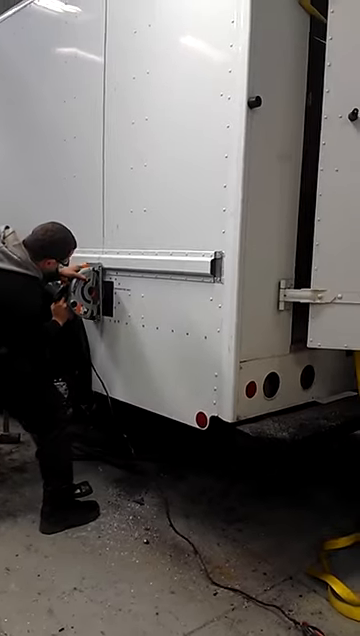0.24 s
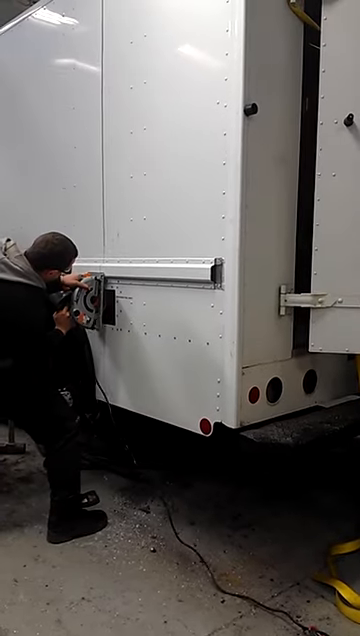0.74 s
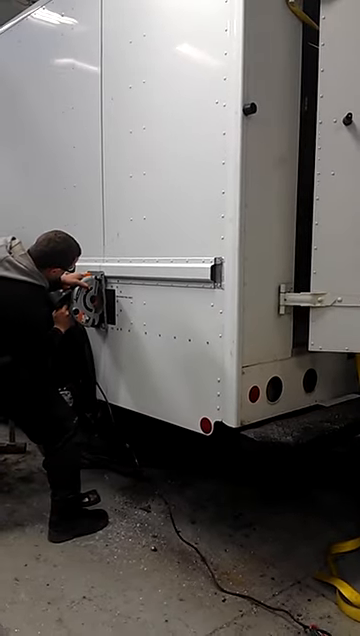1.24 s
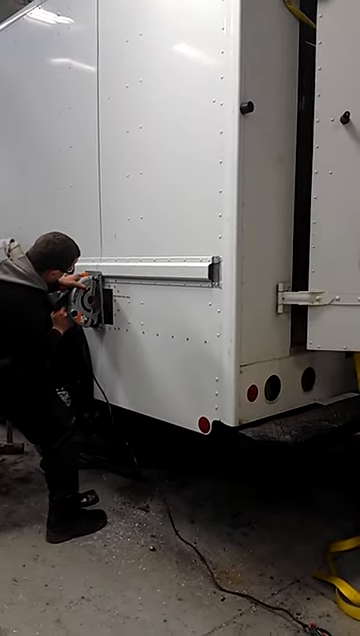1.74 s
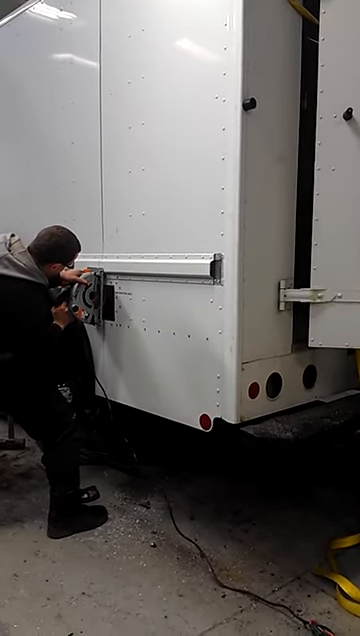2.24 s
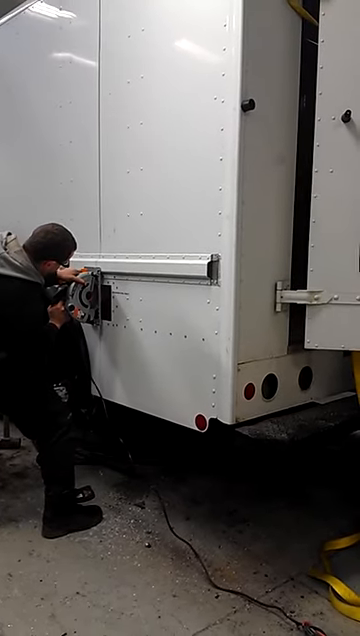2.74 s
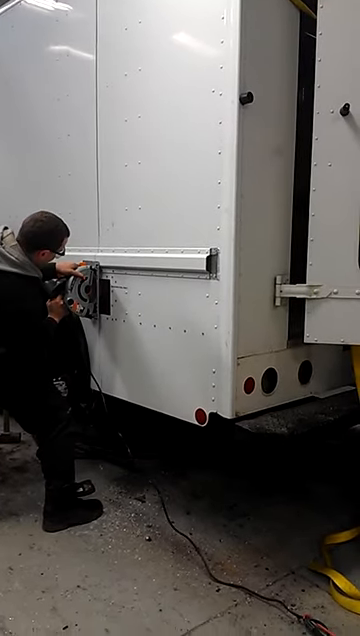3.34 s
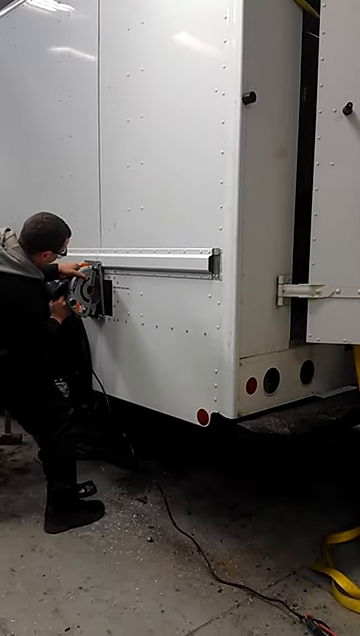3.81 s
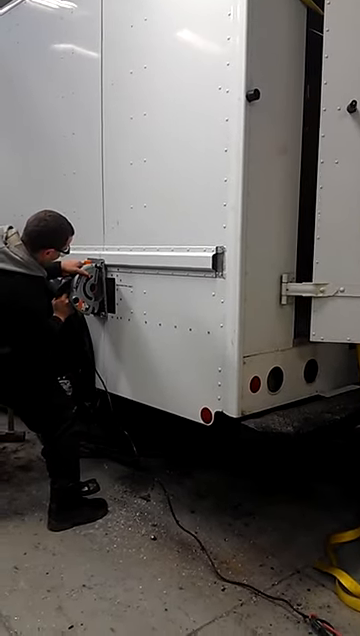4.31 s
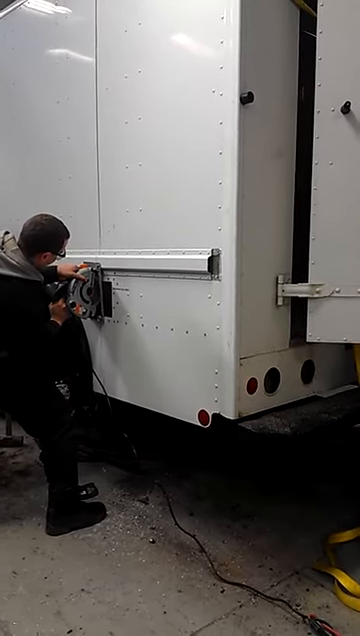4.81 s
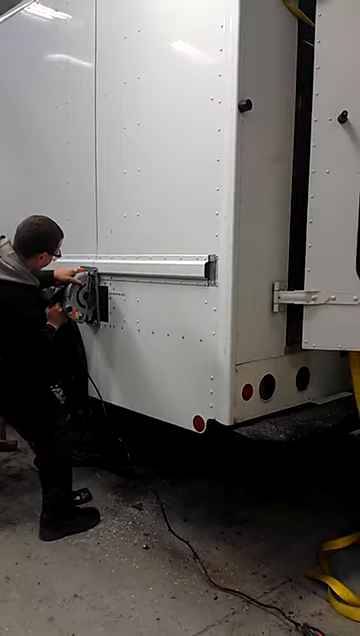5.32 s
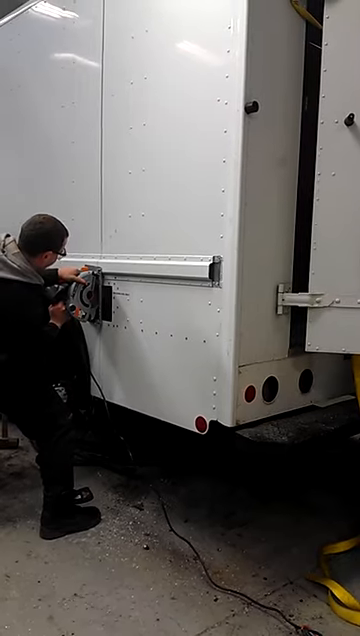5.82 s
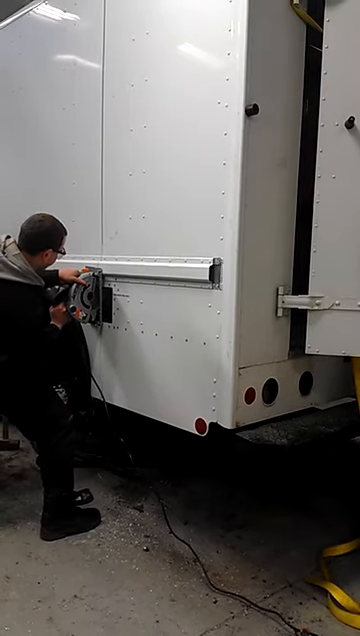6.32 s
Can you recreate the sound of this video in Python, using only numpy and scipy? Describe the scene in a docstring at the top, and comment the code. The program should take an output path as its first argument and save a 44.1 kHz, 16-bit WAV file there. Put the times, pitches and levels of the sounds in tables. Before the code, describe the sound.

Fast compressor puffing with hissing, chattering valves, a sharp panel knock, then a power saw bangs into life and drowns it in bright rushing whine.

```python
"""A piston air compressor chugs in a workshop while a circular saw is set against a truck's metal wall with a clack.
The saw is switched on: it kicks, spins up and runs with a rush of air, a humming housing and a whistling blade.
Puffs, hums and whistles are sines; hiss, rattle, rush and blows are coloured noise; resonances are narrow noise.
The recorder's gain control ducks under the saw, so that the compressor sinks away; a delay widens the stereo."""
import sys
import numpy as np
from scipy import signal
from scipy.fft import rfft, irfft, next_fast_len
from scipy.io import wavfile

SR = 44100
rng = np.random.default_rng(int(sys.argv[2]) if len(sys.argv) > 2 else 0)


def generate_wav(sig):
    """Save sig (samples, or channels by samples) to the path in sys.argv[1] as 16-bit PCM at SR."""
    pcm = np.round(np.clip(np.atleast_2d(sig).T, -1, 1) * 32767).astype(np.int16)
    wavfile.write(sys.argv[1], SR, pcm)


N = 289296
T = np.arange(N) / SR  # time in s


def from_db(db):
    """Decibels to amplitude gain."""
    return np.exp(np.asarray(db) * (np.log(10) / 20))


def rms_one(x):
    """Scale to unit rms."""
    return x / np.sqrt(np.mean(x ** 2) + 1e-20)


def drift(rate_hz):
    """Slow random wandering of rms 1: noise through two equal low-pass poles, made at a twentieth of SR."""
    step, settle = 20, 2000
    r = np.exp(-2 * np.pi * rate_hz * step / SR)
    white = rng.standard_normal(N // step + settle + 2)
    slow = signal.lfilter([1], [1, -2 * r, r * r], white)[settle:]
    return np.interp(np.arange(N) / step, np.arange(len(slow)), rms_one(slow))


def noise(spectrum, diffuse=0.61, diffuse_hz=1800):
    """Stereo noise of a given colour, middle at rms 1; the treble reaches the two microphones less alike."""
    size = next_fast_len(N)
    hz = np.arange(size // 2 + 1) * SR / size + 1e-3
    points, levels = np.transpose(spectrum)
    # silent outside the listed range
    colour_db = np.interp(np.log(hz), np.log(points), levels, left=-np.inf, right=-np.inf)
    mid, side = rfft(rng.standard_normal((2, size))) * from_db(colour_db)
    side = side * diffuse * hz / np.hypot(hz, diffuse_hz)
    mid, side = irfft(mid, size)[:N], irfft(side, size)[:N]
    return (mid + side * [[1], [-1]]) / mid.std()


def turns(hz):
    """Phase in radians of a steady or gliding pitch, from a random start."""
    return 2 * np.pi * (np.cumsum(hz * np.ones(N)) / SR + rng.random())


def singing(hz, half_width_hz):
    """A resonance kept ringing by turbulence: a narrow band of noise about a steady or gliding pitch; rms 1."""
    phase = (turns(hz) % (2 * np.pi)).astype(np.float32)
    return drift(half_width_hz) * np.cos(phase) + drift(half_width_hz) * np.sin(phase)


def tone(hz, waver_db, waver_hz):
    """A sine whose strength wavers; rms 1."""
    return rms_one(np.sin(turns(hz)) * from_db(waver_db * drift(waver_hz)))


def fading(start_s, t60_s):
    """Envelope of a sudden start that dies away by 60 dB in t60_s."""
    out, start = np.zeros(N), int(start_s * SR)
    age = T[:min(N - start, int(2 * t60_s * SR))]
    out[start:start + len(age)] = from_db(-60 * age / t60_s)
    return out


def arch(start_s, length_s):
    """Envelope that swells and sinks again in one rounded arch."""
    share = np.clip((T - start_s) / length_s, 0, 1)
    return np.maximum(np.sin(np.pi * share), 0) ** .65


PUMP_HZ = 11.941  # turns per second
# puffs in one turn of the pump: turn_share [0-1], pipe_pitch_hz [Hz], level_db [dB], half_length_s [s]
PUFFS = [(.162, 230, -16.3, .0035), (.418, 213, -14.1, .0049), (.52, 290, -18.2, .006),
         (.608, 192, -24.2, .0086), (.673, 261, -26.7, .011), (.983, 199, -22.9, .0037)]
# colour of the breathy chuff: frequency_hz [Hz], relative_level_db [dB per Hz]
CHUFF_SPECTRUM = [(25, -66), (60, -27), (100, -19), (140, -16), (175, 0.5), (260, -2.5), (330, -3),
                  (420, -11), (600, -48)]


def pump_puffs(clock, puff_db=0.3, uneven_db=1.06, chuff_db=-30, chuff_follow=0.14):
    """Each turn sends the same puffs through the intake pipe, over a breath that swells a little with them."""
    count = int(N / SR * PUMP_HZ) + 4
    puffs, flow = np.zeros(N), np.zeros(N)
    for share, hz, level_db, half_length in PUFFS:
        turn = np.round(clock * PUMP_HZ - share).astype(int)
        age = clock - (turn + share) / PUMP_HZ
        # each turn's puff has a slightly different strength
        strength_db = puff_db + level_db + uneven_db * rng.standard_normal(count)[turn + 1]
        swell = from_db(strength_db) * np.exp(-.5 * (age / half_length) ** 2)
        puffs += swell * np.cos(2 * np.pi * hz * age)
        flow += swell
    breath = rms_one(1 + chuff_follow * rms_one(flow))
    return puffs + from_db(chuff_db) * breath * noise(CHUFF_SPECTRUM)


# the valves open once in each turn: turn_share [0-1], level_db [dB]
VALVE_OPENINGS = [(.5, -29.5), (.98, -32.5)]
# colour of the valves' hiss: frequency_hz [Hz], relative_level_db [dB per Hz]
VALVE_SPECTRUM = [(1470, -54), (2500, -21), (3390, -14), (3980, -5.5), (5870, -6), (6210, -5), (6760, -6.5),
                  (7730, -2), (9620, -13.5), (11200, -19), (12700, -32.5), (13500, -55)]


def valves(leak_db=-31, t60_s=0.23, uneven_db=2.9, flutter_db=1):
    """A steady leak, and a dying hiss of uneven strength at every opening of a valve."""
    count = int(N / SR * PUMP_HZ) + 3
    power = from_db(leak_db) ** 2
    for share, db in VALVE_OPENINGS:
        turn, part = np.divmod(T * PUMP_HZ - share % 1, 1)
        strength_db = db + uneven_db * rng.standard_normal(count)[turn.astype(int) + 1]
        dying = np.exp(-np.log(1000) * part / PUMP_HZ / t60_s)
        power = power + (from_db(strength_db) * dying) ** 2
    return np.sqrt(power) * from_db(flutter_db * drift(26)) * noise(VALVE_SPECTRUM)


# the valve plate chatters as it opens, some turns much harder than others: start_s [s], level_db [dB]
CHATTERS = [(.044, -28.5), (.215, -27), (.25, -28), (0.545, -23), (.63, -29), (.715, -29), (.88, -35),
            (.925, -31), (1.047, -21), (1.426, -31), (1.47, -27), (1.551, -25), (1.59, -31), (1.718, -38),
            (1.755, -24), (1.8, -41), (1.887, -25.5), (1.925, -29), (1.971, -29), (2.055, -24),
            (2.142, -37), (2.22, -28), (2.309, -26), (2.39, -29), (2.429, -27), (2.56, -27), (2.643, -29),
            (2.727, -34), (2.812, -23.5), (2.89, -20), (3.15, -30), (3.315, -25.5)]
# the plate's resonances: pitch_hz [Hz], width_hz [Hz], level_db [dB, within a chatter]
PLATE = [(5210, 110, -10), (6170, 400, -7), (7200, 76, -6.5), (7860, 120, -3.5), (7800, 300, -6)]


def chatter(rise_s=0.0032, t60_s=0.18, hiss_db=-6.5, grain_db=2.0, grain_hz=170):
    """The valve plate buzzes on its seat: grainy bursts that ring its resonances, with a little hiss."""
    power = 0
    for start, db in CHATTERS:
        rise = np.clip((T - start) / rise_s, 0, 1)
        power = power + (from_db(db) * rise * fading(start, t60_s)) ** 2

    def plate():
        return sum(from_db(db) * singing(hz, width / 2) for hz, width, db in PLATE)

    # one ringing shared by both microphones, one more for each alone
    left, right, both = plate(), plate(), plate()
    ringing = both + .5 * np.array([left, right]) + from_db(hiss_db) * noise(VALVE_SPECTRUM)
    return np.sqrt(power) * rms_one(from_db(grain_db * drift(grain_hz))) * ringing


# tank hum: pump_multiple [times the pump rate], level_db [dB]
TANK_HUM = [(8, -52), (10, -44), (11, -50), (12, -56), (33, -41.5), (41, -43), (47, -46), (57, -44.5)]
# colour of the frame's rattle: frequency_hz [Hz], relative_level_db [dB per Hz]
RATTLE_SPECTRUM = [(210, 1), (350, -2.5), (450, -4), (526, -4.5), (748, -2), (1010, -5), (1090, -8),
                   (1280, -8), (1610, -12.5), (1920, -10), (3200, -18.5), (4160, -20), (7040, -120)]
# the frame shakes louder for a moment: centre_s [s], level_db [dB]
SHAKES = [(.14, -41), (.18, -25.5), (.29, -30), (.46, -29), (.645, -27), (.85, -29), (.972, -29),
          (1.485, -28.5), (1.545, -28), (1.62, -32), (1.81, -38), (2.095, -30), (2.495, -28), (2.81, -31),
          (2.85, -24.5), (3.055, -25.5)]


def frame_rattle(steady_db=-26.5, shake_half_s=0.017):
    """The loose frame rattles as fluttering noise; short bell-shaped bursts of power add to it."""
    power = from_db(steady_db) ** 2
    for centre, db in SHAKES:
        distance = np.minimum(((T - centre) / shake_half_s) ** 2, 20)
        power = power + from_db(db) ** 2 * np.exp(-distance)
    return np.sqrt(power) * from_db(0.86 * drift(79)) * noise(RATTLE_SPECTRUM)


def compressor(wander_s=.0007, wander_hz=1.2, drone_hz=224.2, drone_db=-35.5):
    """Puffs and tank hum share one wandering beat; motor drone, frame rattle and valves join them."""
    # the belt lets the pump run slightly ahead or behind
    clock = T + wander_s * drift(wander_hz)
    hum = 0
    for multiple, db in TANK_HUM:
        phase = 2 * np.pi * (multiple * PUMP_HZ * clock + rng.random())
        hum = hum + from_db(db) * rms_one(np.sin(phase))
    drone = from_db(drone_db) * tone(drone_hz + 2 * drift(2.95), waver_db=2.5, waver_hz=1.8)
    return pump_puffs(clock) + hum + drone + frame_rattle() + valves() + chatter()


# the wall flexes as the saw lands and as it kicks: start_s [s], level_db [dB], t60_s [s]
THUMPS = [(1.04, -23, .1), (3.401, -21, 0.13)]
# colour of the thud: frequency_hz [Hz], relative_level_db [dB per Hz]
THUMP_SPECTRUM = [(30, -33), (70, -16), (140, 2), (250, -4), (700, -7), (1200, -16), (2500, -29)]


def thumps():
    """The whole wall gives under the saw with a dull thud: low noise that dies away."""
    return sum(from_db(db) * fading(start, t60) for start, db, t60 in THUMPS) * noise(THUMP_SPECTRUM)


# resonances of wall and saw body: pitch_hz [Hz], level_db [dB, relative to blow and ring_db], t60_s [s]
WALL = [(664.6, 0.5, 1), (728, 3.5, 0.84), (1040, 1.5, 0.6), (1115, -3.5, 0.89), (1830, -13, 0.64),
        (2150, -12, 1), (3080, -14, 0.49), (3580, -2, 0.32), (3840, 3, 0.28), (4640, -13, 0.7),
        (4850, -2, 0.9), (6600, -4.5, 0.99)]


def blows(rows, spectrum, ring_db, room_db, room_t60_s):
    """Blows on the wall: a dense clatter of sheet metal that shakes its modes, and the workshop's tail."""
    clatter = sum((from_db(db) * fading(start, t60)) ** 2 for start, db, t60 in rows)  # power

    def dying(t60_s):
        return np.sqrt(sum((from_db(db) * fading(start, t60_s)) ** 2 for start, db, _ in rows))

    # each wall resonance is a cluster of close panel modes that beat
    rings = 0
    for hz, db, t60 in WALL:
        rings = rings + from_db(db + ring_db) * dying(t60) * singing(hz, half_width_hz=48)
    # the sheet metal's rattle makes the clatter ragged
    clatter = clatter * rms_one(from_db(1.5 * drift(160))) ** 2
    tail = (from_db(room_db) * dying(room_t60_s)) ** 2
    return np.sqrt(clatter + tail) * noise(spectrum) + rings


# the saw's shoe knocks on the wall: start_s [s], level_db [dB], t60_s [s]
KNOCKS = [(1.0445, -14, 0.05), (1.049, -18, 0.73), (1.083, -18.5, 0.048), (1.11, -25.5, 0.11),
          (1.143, -29, 0.17)]
# colour of the knocks: frequency_hz [Hz], relative_level_db [dB per Hz]
KNOCK_SPECTRUM = [(150, -30), (400, -6), (900, -1.5), (1300, -3), (2200, -1.5), (2900, -2), (3900, 2.5),
                  (4500, 2), (6300, -8), (8000, -6.5), (11000, -26), (13000, -42)]


def shoe_knocks():
    """The shoe is set on the metal wall: a few sharp blows that ring the panel."""
    return blows(KNOCKS, KNOCK_SPECTRUM, ring_db=-21.5, room_db=-5.0, room_t60_s=0.77)


# the motor's kick at switch-on: start_s [s], level_db [dB], t60_s [s]
KICKS = [(3.4075, -17, 0.1), (3.413, -8, 0.1), (3.421, 1, 0.023)]
# colour of the kick: frequency_hz [Hz], relative_level_db [dB per Hz]
KICK_SPECTRUM = [(25, -38), (60, -31), (160, -19), (420, -10), (700, -1), (890, -14), (1050, -12),
                 (1600, -7.5), (2400, -6.5), (3100, -9), (3900, -2), (4850, -7), (5400, -8), (8000, -6),
                 (9400, -10), (11000, -20.5), (13700, -20)]


def motor_kick():
    """The motor jerks the saw against the wall at switch-on, which rings the same panel harder."""
    return blows(KICKS, KICK_SPECTRUM, ring_db=-11.5, room_db=-4.5, room_t60_s=0.96)


# blade whistles, levels before the saw's gain:
# name: full_speed_pitch_hz [Hz], pitch_drop_at_rest [share], level_between_squeals_db [dB], flutter_db [dB]
WHISTLES = {"main": (3742, .1, -38.5, 1.4), "high": (7304, .022, -40, 2.3), "low": (3596, .04, -46, 1.5),
            "middle": (4589, .01, -43.5, 2), "lower middle": (4489, .01, -42, 2.5)}
# squeals, in which one whistle takes hold, before the saw's gain:
# start_s [s], length_s [s], whistle [name], level_db [dB]
SQUEALS = [(3.612, .125, "main", -23), (3.743, .125, "main", -19.5), (3.82, .2, "main", -30.5),
           (3.72, .2, "lower middle", -31), (3.93, .1, "high", -33), (4.02, .3, "middle", -31),
           (4.03, .13, "high", -27), (4.26, .12, "high", -25), (4.42, .16, "high", -29),
           (4.6, .17, "high", -28.5), (4.78, .3, "lower middle", -35), (4.81, .14, "high", -29),
           (4.92, .5, "main", -30), (5.1, .07, "high", -27), (5.24, .13, "high", -28.5),
           (5.41, .04, "high", -29), (5.47, .07, "high", -29), (5.42, .3, "main", -33),
           (5.6, .9, "lower middle", -36), (5.68, .5, "high", -33.5), (5.74, .74, "main", -28),
           (5.7, .8, "middle", -36), (5.95, .5, "low", -33), (6.44, .16, "high", -28.5),
           (6.46, .14, "main", -32.5)]
# fainter blade modes, before the saw's gain: full_speed_pitch_hz [Hz], level_db [dB]
BLADE_MODES = [(1245, -54), (1485, -52.5), (2051, -45), (2545, -50.5), (2692, -50), (2751, -51),
               (4032, -46), (5453, -41.5), (5642, -48), (5940, -48), (6255, -44), (6584, -44),
               (6821, -43.5), (7106, -47), (7704, -43), (7849, -41.5), (8086, -44.5), (8678, -43.5),
               (8823, -44.5), (8974, -47), (9211, -46), (9803, -51), (10201, -51)]


def blade(speed, waver_hz=30):
    """Air over the teeth makes the blade sing and now and then squeal; spinning stiffens it and lifts its modes."""
    slack, whistles = 1 - speed, 0
    for name, (hz, drop, quiet_db, waver_db) in WHISTLES.items():
        squeals = [from_db(db) * arch(start, length) for start, length, which, db in SQUEALS if which == name]
        # the strongest of squeals and quiet whistle wins
        gain = np.max(squeals + [from_db(quiet_db) * speed], axis=0)
        pitch = hz * (1 - drop * slack + .0005 * drift(10))
        whistles = whistles + gain * tone(pitch, waver_db, waver_hz)
    modes = sum(from_db(db) * singing(hz * (1 - .022 * slack), half_width_hz=5) for hz, db in BLADE_MODES)
    return speed * whistles + speed ** 4 * modes


def near_echoes(x, count=6, shortest_s=.002, longest_s=.016, share=.33):
    """Echoes from wall, floor and truck body cut fine notches in the sound, at about unchanged power."""
    lags = (rng.uniform(shortest_s, longest_s, count) * SR).astype(int)
    echoes = sum(np.pad(x, ((0, 0), (lag, 0)))[:, :N] for lag in lags) / np.sqrt(count)
    return (x + share * echoes) / np.hypot(1, share)


# colours of the straining motor's grind and the rushing air: frequency_hz [Hz], relative_level_db [dB per Hz]
GRIND_SPECTRUM = [(71, -62), (120, -45), (201, -11), (363, -11), (434, -6), (469, -10.5), (657, -0.5),
                  (937, -4.5), (1030, -3.5), (2110, 2), (2780, -1.5), (3660, 2), (6370, -1.5), (8570, 2),
                  (13500, -27)]
RUSH_SPECTRUM = [(88, -78), (150, -48), (181, -30), (330, -21.5), (482, -16.5), (780, -10), (980, -12),
                 (1380, -11.5), (2090, -8), (3350, -7), (3680, -5), (4200, -6), (6980, -6.5), (7530, -4),
                 (13500, -26)]
# the motor's howl while it strains, before the saw's gain:
# rest_pitch_hz [Hz], full_speed_pitch_hz [Hz], width_hz [Hz], level_db [dB]
HOWL = [(2050, 2560, 190, -34), (4400, 4620, 130, -39), (3900, 4520, 130, -37.5)]
# housing resonances, before the saw's gain: pitch_hz [Hz], width_hz [Hz], level_db [dB]
HOUSING = [(448, 44, -59.5), (1067, 28, -50.5), (2470, 630, -44), (3777, 370, -41), (4750, 270, -42),
           (8560, 3300, -31.5)]
# hum of the running motor, before the saw's gain: pitch_hz [Hz], level_db [dB]
MOTOR_HUM = [(447, -61), (899, -56), (1067, -53.5)]
# the wall takes up a tone for a while, before the saw's gain:
# start_s [s], length_s [s], pitch_hz [Hz], level_db [dB]
HUM_SWELLS = [(4.5, .72, 445, -51), (5.75, .85, 899, -47), (5.95, .6, 450, -48.5), (5.85, .7, 1085, -48.5)]
# the saw runs a little louder for a while: start_s [s], length_s [s], rise_db [dB]
SURGE = (5.1, .85, 1.8)


def saw(rush_db=-24.0, grind_db=-22.5, chop=0.1, flutter=0.041, lowest_hz=150):
    """The motor grinds and howls up to speed; fan and gear chop the rushing air, and the housing hums."""
    start_s, spin_up_s, gear_hz = 3.413, .3, 760
    saw_gain_db, growth = 34.5, 0.96  # growth: power of the speed that sets the amplitude
    speed = 1 - np.exp(-np.maximum(T - start_s, 0) / spin_up_s)
    running = speed ** 4
    strain = np.sqrt(1 - running)

    mesh_hz = gear_hz * speed * (1 + 0.00045 * drift(6.7))
    fan_hz = mesh_hz / 5
    chopping = 1 + chop * np.sin(turns(mesh_hz)) + flutter * np.sin(turns(fan_hz))
    rush = from_db(rush_db) * np.sqrt(running) * noise(RUSH_SPECTRUM)
    grind = from_db(grind_db) * strain * noise(GRIND_SPECTRUM)
    air = near_echoes(rush + grind) * chopping * from_db(0.81 * drift(64))

    howl = 0
    for rest, full, width, db in HOWL:
        pitch = rest + (full - rest) * running
        howl = howl + strain * from_db(db) * singing(pitch, width / 2)
    housing = running * sum(from_db(db) * singing(hz, width / 2) for hz, width, db in HOUSING)
    hum = running * sum(from_db(db) * tone(hz, waver_db=4.0, waver_hz=2.4) for hz, db in MOTOR_HUM)
    for start, length, hz, db in HUM_SWELLS:
        hum = hum + from_db(db) * arch(start, length) * tone(hz, waver_db=3.5, waver_hz=8)

    surge_start, surge_length, surge_db = SURGE
    gain = from_db(saw_gain_db + surge_db * arch(surge_start, surge_length)) * speed ** growth
    sound = gain * (air + howl + hum + housing + blade(speed))
    # so small a body radiates no bass
    return signal.sosfilt(signal.butter(4, lowest_hz, "high", fs=SR, output="sos"), sound)


def scene():
    """Compressor, the saw set on the wall, its kick and its run."""
    return compressor() + thumps() + shoe_knocks() + motor_kick() + saw()


def gain_control(x, threshold_db=-21.0, attack_s=0.021, release_db_per_s=28, sense_hz=500,
                 window_s=0.0054, smooth_hz=120):
    """Loud sound pulls the gain down quickly; it creeps back afterwards."""
    # the level is sensed with the bass weakened
    sensed = signal.sosfilt(signal.butter(1, sense_hz, "high", fs=SR, output="sos"), x.mean(0))
    r, a = np.exp(-1 / (window_s * SR)), np.exp(-1 / (attack_s * SR))
    power = signal.lfilter([1 - r], [1, -r], sensed ** 2)
    over_db = np.maximum(10 * np.log10(power + 1e-12) - threshold_db, 0)
    # peaks are held and let go at a steady rate
    held_db = np.maximum.accumulate(over_db + release_db_per_s * T) - release_db_per_s * T
    attacked_db = signal.lfilter([1 - a], [1, -a], held_db)
    duck_db = signal.sosfilt(signal.butter(1, smooth_hz, fs=SR, output="sos"), attacked_db)
    return x * from_db(-duck_db)


def widen(x, bass_width=0.97, treble_width=0.49, split_hz=1900):
    """The middle, 1.6 ms late, is taken from the left and added to the right: a comb of its own on each side."""
    late = np.pad(x.mean(0), (71, 0))[:N]  # 71 samples
    bass = signal.sosfiltfilt(signal.butter(1, split_hz, fs=SR, output="sos"), late)
    side = bass_width * bass + treble_width * (late - bass)
    side = signal.sosfilt(signal.butter(1, 45, "high", fs=SR, output="sos"), side)
    return x + side * [[-1], [1]]


def record(dry):
    """The recorder: gain control, stereo widening, rounded peaks and a steep top cut."""
    wide = widen(gain_control(dry))
    rounded = 1.2 * np.tanh(wide / 1.2)
    # 70 dB down from 14595 Hz upwards
    return signal.sosfilt(signal.cheby2(14, 70, 14595, fs=SR, output="sos"), rounded)


dry = scene()
out = record(dry)
generate_wav(out)
```